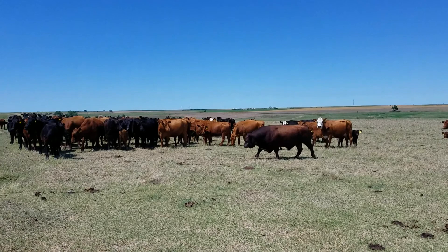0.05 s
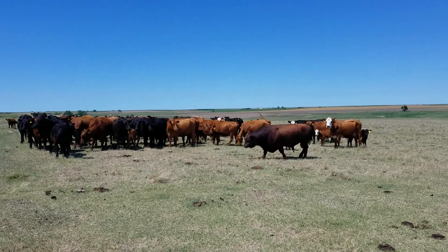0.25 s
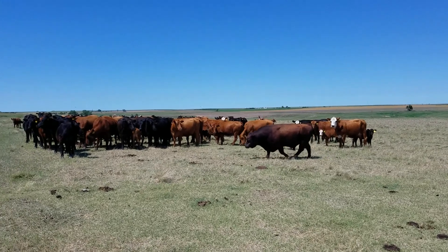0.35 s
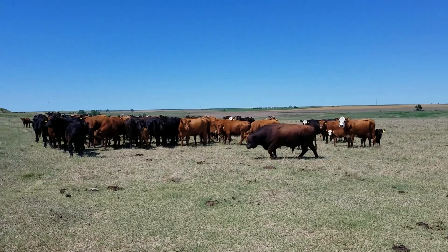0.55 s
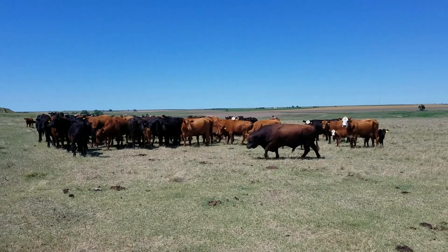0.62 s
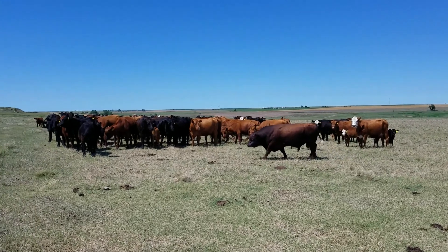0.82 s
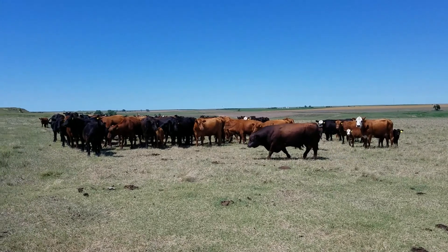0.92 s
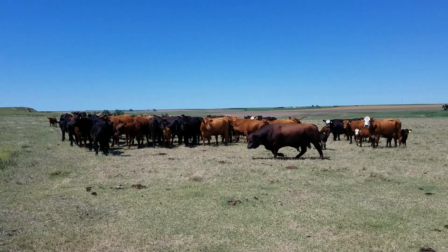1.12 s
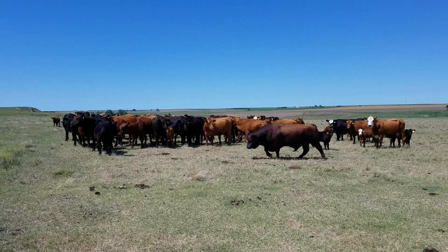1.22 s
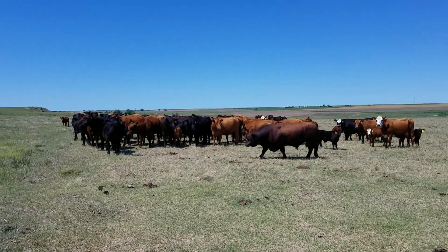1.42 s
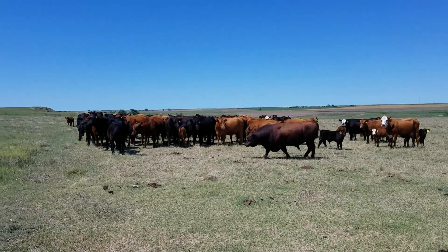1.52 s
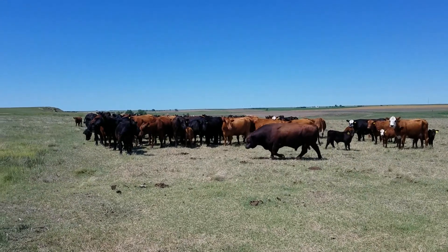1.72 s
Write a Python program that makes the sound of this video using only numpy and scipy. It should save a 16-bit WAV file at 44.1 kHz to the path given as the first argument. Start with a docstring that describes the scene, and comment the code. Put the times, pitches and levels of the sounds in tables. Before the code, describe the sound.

A bull bellows in an open pasture, slightly to the left. Its low groan swoops up by 0.25 seconds to a held, hoarse note with a squeal on top, loudest around 0.7 to 1.1 seconds, then drops into a grunt at 1.2. Two fainter cows moo from about 0.3 seconds, one stopping at 1.0, the other at 1.6. A faint herd drone and light wind continue throughout.

```python
"""Light wind and the low drone of a herd lie over an open pasture. A bull starts a low groan
that swoops up to a held, hoarse note, and farther off two cows begin to moo. While he strains,
his tense vocal folds add a squeal on top. One cow stops; then the bull's mouth shuts, his
pitch drops and his voice cracks into a grunt. The other cow outlasts him, leaving drone and wind."""
import sys
import numpy as np
from scipy import signal
from scipy.fft import rfft, irfft
from scipy.io import wavfile

SR = 44100
rng = np.random.default_rng(int(sys.argv[2]) if len(sys.argv) > 2 else 0)


def wav_record(signal):
    """Record a signal, one row per channel, as 16-bit PCM in the file named by sys.argv[1]."""
    frames = np.transpose(np.atleast_2d(signal))
    bounded = np.clip(frames, -1, 1)
    # unit amplitude maps onto the largest positive 16-bit level
    quanta = np.round(bounded * 32767).astype(np.int16)
    wavfile.write(sys.argv[1], SR, quanta)


N = 77175
TIME = np.arange(N) / SR
FREQS = np.fft.rfftfreq(2 * N, 1 / SR)


def amp(db):
    """Turns decibels into a number to multiply by."""
    return 10 ** (np.asarray(db) / 20)


def unit(x):
    """Scales a signal to an average strength (rms) of 1."""
    return x / np.sqrt(np.mean(x ** 2) + 1e-20)


def curve(table, column=1):
    """Joins the points of one table column over time."""
    rows = np.array(table)
    return np.interp(TIME, rows[:, 0], rows[:, column])


def level(table, column=2):
    """Loudness over time from a dB column, fading fast outside the table's times."""
    outside_s = np.maximum(table[0][0] - TIME, TIME - table[-1][0]).clip(0)
    return amp(curve(table, column)) * np.exp(-outside_s / 0.0027)


def spectrum(table, column=1):
    """Joins the points of one table column from bass to treble."""
    rows = np.array(table)
    return np.interp(np.log(FREQS + 1), np.log(rows[:, 0] + 1), rows[:, column])


def colour(x, gain):
    """Turns each frequency up or down by its own gain."""
    return irfft(rfft(x, 2 * N) * gain)[..., :N]


def wobble(hz):
    """A random wiggle of strength 1, mostly slower than hz."""
    return unit(colour(rng.standard_normal(N), 1 / (1 + (FREQS / hz) ** 4)))


def cycles(table):
    """Counts the vibrations so far along a table's pitch."""
    return np.cumsum(curve(table)) / SR


# The wind's tone colour: f/Hz, relative level/dB, how alike left and right are/0-1
WIND_COLOUR = [(20, -1, 0.021), (45, 1.5, .3), (110, -0.5, 0.34), (170, 0, 0.46), (323, -7.5, 0.55),
               (950, -14.5, 0.4), (1290, -20.5, 0.28), (2490, -16.5, 0), (4970, -23, 0), (10500, -29, 0),
               (13000, -23, 0), (15600, -25.5, 0)]


def wind():
    """Moving air makes a soft, lumpy rumble and hiss, partly different in each ear."""
    shared, separate = rng.standard_normal((2, N))
    gain, alike = amp(spectrum(WIND_COLOUR)), spectrum(WIND_COLOUR, 2)
    left = colour(shared, gain)
    right = colour(shared, gain * alike) + colour(separate, gain * np.sqrt(1 - alike ** 2))
    level_db = -61 + 1.6 * wobble(9.8)
    return amp(level_db) * unit(np.array([left, right]))


def ground_echo(sound, level_db=-18, fade_s=.25):
    """The ground and the herd scatter a faint, short echo to both ears."""
    t = TIME[:SR // 2]
    tail = rng.standard_normal((2, len(t))) * amp(-60 * t / fade_s)
    tail /= np.linalg.norm(tail[0])
    return amp(level_db) * signal.fftconvolve(sound[None], tail, axes=1)[:, :N]


def throat_delay(throat, column, smear_s_per_hz=5e-7, echo_radians=1.1, echo_s=.0014):
    """A throat smears each pulse: it rings, treble comes late, echoes run between folds and lips."""
    log_gain = np.log(amp(spectrum(throat, column)))
    ringing = -signal.hilbert(np.r_[log_gain, log_gain[-2:0:-1]]).imag[:N + 1]
    late_treble = -np.pi * smear_s_per_hz * FREQS ** 2
    echoes = echo_radians * np.sin(2 * np.pi * echo_s * FREQS)
    return np.exp(1j * (ringing + late_treble + echoes))


def voice(pitch_hz, turns, throat, mouth=0, open_column=1):
    """Vocal folds buzz at whole multiples of the pitch; throat and mouth set each one's strength."""
    narrow, wide = amp(spectrum(throat)), amp(spectrum(throat, open_column))
    delay = throat_delay(throat, open_column)
    buzz, power = 0, 0
    for k in range(1, 35):
        at = (k * pitch_hz / FREQS[1]).astype(int)
        gain = (1 - mouth) * narrow[at] + mouth * wide[at]
        buzz += gain * (np.exp(2j * np.pi * k * turns) * delay[at]).real
        power += gain ** 2 / 2
    return buzz / np.sqrt(power)


# The tunes of the herd's drone and the two cows: t/s, f/Hz, level/dB
HERD_DRONE = [(0, 80.92, -54), (.3, 82.06, -54), (1.0, 83.3, -61), (1.08, 80.44, -68), (1.35, 78.36, -64),
              (1.45, 78.4, -67.5), (1.75, 83.25, -67.5)]
SHORT_MOO = [(.22, 168.1, -56), (.31, 173, -44.5), (.42, 172, -55.5), (.62, 181.9, -55), (.8, 177, -55.5),
             (.89, 168.5, -47.5), (.95, 150, -42), (.99, 130.3, -66)]
LONG_MOO = [(.3, 166.7, -67), (.38, 173.6, -53.5), (.6, 179.7, -51), (.88, 174.9, -51), (1.1, 186.7, -50),
            (1.22, 187.9, -49.5), (1.4, 187, -50), (1.47, 185.9, -51), (1.52, 183, -53), (1.56, 175, -58.5),
            (1.585, 152.7, -51), (1.61, 150, -64)]
# How their throats colour the sound: f/Hz, relative level/dB
HERD_THROAT = [(80, 0.5), (160, -1), (245, -4.5), (330, -5.5), (420, -27), (800, -18), (970, -1.5),
               (1060, -13), (1180, -6), (1350, -21), (2000, -15.5), (3000, -42.5)]
SHORT_THROAT = [(160, -15), (330, -18), (440, 1.5), (540, 2), (700, -15), (1200, -8), (3000, -29),
                (6000, -49.5)]
LONG_THROAT = [(185, -16), (300, 1), (375, 2.5), (470, 13.5), (555, -14.5), (750, -6.5), (940, -11),
               (1130, 1.5), (1320, -5.5), (1700, -10.5), (2050, -17), (2630, -20.5), (2820, -7.5),
               (3350, -12), (3570, -14), (3950, -21.5), (4150, -26.5), (4700, -35.5), (4900, -24),
               (5150, -33.5), (7000, -37)]


def moo(tune, throat, waver_cycles):
    """A far-off animal sends a slightly wavering buzz through a throat that keeps its shape."""
    turns = cycles(tune) + waver_cycles * wobble(24)
    return level(tune) * voice(curve(tune), turns, throat)


# The three tones of the bull's squeal: t/s, f/Hz, level/dB
SQUEAL_HIGH = [(.35, 940.7, -60), (.42, 994, -47), (.5, 1117, -42), (.55, 1149, -38), (.65, 1194, -36),
               (.74, 1211, -36), (.82, 1199.7, -35), (.89, 1198.3, -34), (.96, 1162.7, -36),
               (1.01, 1147, -42), (1.04, 1110, -70)]
SQUEAL_MID = [(0.269, 797, -60), (0.339, 843, -43), (0.408, 868, -42), (0.469, 938, -44.5),
              (0.521, 1009, -45.5), (.62, 1091, -42.5), (0.731, 1134, -50.5), (.86, 1116, -46),
              (.96, 1065, -46), (1.03, 1040, -57.5)]
SQUEAL_LOW = [(.48, 616, -64.5), (.55, 635, -51.5), (.65, 641, -45), (0.749, 641.6, -41.5),
              (0.901, 644.6, -44.5), (1.0, 623, -51.5), (1.04, 604, -65)]


def squeal(turns, waver_cycles=0.019):
    """Tense folds add three free tones; the main pulse and the lowest tone shake the upper two."""
    high, mid, low = (level(tune) * np.cos(2 * np.pi * (cycles(tune) + waver_cycles * wobble(70)))
                      for tune in (SQUEAL_HIGH, SQUEAL_MID, SQUEAL_LOW))
    chop = 0.094 * (np.cos(2 * np.pi * turns) + np.cos(4 * np.pi * turns))
    mixing = 0.15 * low / abs(low).max()
    return np.sqrt(2) * (low + (high + mid) * (1 + chop + mixing))


# The tone colour of the bull's hoarse rasp, plus a thin high hiss that follows his loudness:
# f/Hz, relative level/dB
RASP_COLOUR = [(100, -37), (200, -6), (280, -11.5), (520, -4.5), (660, -7), (850, -0.5), (1250, 2),
               (1550, -2.5), (1750, -9.5), (1950, -6), (2300, -10), (2850, -10.5), (3600, -20), (4300, -40),
               (6500, -40), (8000, -49), (10500, -44.5), (13500, -35), (15600, -43.5)]


def rasp(turns, mouth, puff_share=0.77, puff_cycles=0.75):
    """Rough noise puffs once per vibration, softer and duller while the mouth is half shut."""
    puffs = 1 - puff_share + puff_share * unit(np.exp(-(turns % 1) / puff_cycles))
    bright = unit(colour(puffs * rng.standard_normal(N), amp(spectrum(RASP_COLOUR))))
    muffle_db = -12 + 8 / (1 + (FREQS / 3400) ** 6)  # bass loses 4 dB, treble 12 dB
    return mouth * bright + (1 - mouth) * colour(bright, amp(muffle_db))


# The bull's tune: t/s, f/Hz
BULL_PITCH = [(0, 98), (.1, 130), (.15, 146), (.2, 165), (.24, 196.4), (.34, 198.1), (.44, 193.9),
              (.52, 199), (.64, 202.5), (.78, 203), (1.06, 202.8), (1.12, 199.8), (1.16, 184), (1.185, 160),
              (1.23, 148)]
# How hard he pushes: t/s, voice level/dB, rasp level/dB, mouth opening/0-1
BULL_EFFORT = [(0, -60.5, -54.5, 0.3), (.1, -57.5, -58.5, 0.6), (.15, -45.5, -47, 0.33),
               (.21, -41.5, -48, 0.08), (.26, -38, -46.5, 0), (.35, -34, -38, 0.2),
               (.47, -33.5, -40.5, 0.77), (.58, -31.5, -39.5, .75), (.75, -30, -40.5, 1),
               (.96, -29.5, -45.5, 1), (1.01, -29.5, -41.5, 1), (1.06, -30, -44, 1), (1.14, -34, -46.5, 1),
               (1.175, -38.5, -41, 0.4), (1.215, -49, -54, 0), (1.24, -76, -79.5, 0)]
# His throat and mouth: f/Hz, relative level half open/dB, relative level wide open/dB
BULL_THROAT = [(91, -3, -20), (150, -8.5, -10), (199.4, 2.5, -2.5), (270, -12, -9), (335, -9, -8),
               (404, -11, -10.5), (469, -3, -9), (536, -0.5, -15.5), (614, -15.5, -14.5), (706, -4, -11),
               (814, 1, -6.5), (995, -21, -16), (1228, -0.5, 2), (1417, -18, -17.5), (1790, -22, -19),
               (2008, -18, -12.5), (2130, -39, -26.5), (2440, -29.5, -16.5), (2840, -37, -25),
               (3280, -50, -25.5), (4010, -48, -43), (4056, -63.5, -33), (4086, -63, -59),
               (7000, -67, -55.5)]
# How his closing mouth colours the grunt: f/Hz, level change/dB
GRUNT_COLOUR = [(150, -2), (260, 10.5), (340, 8), (480, 3), (680, -13.5), (1000, -3.5), (1500, -1),
                (3000, 4)]


def bellow(waver_cycles=0.0094, tremble=0.072, crack_s=1.19, crack_width_s=0.036, crack_depth=0.57):
    """The bull's folds buzz, with rasp and squeal on top, then slacken and crack into a grunt."""
    voice_gain, rasp_gain = level(BULL_EFFORT, 1), level(BULL_EFFORT, 2)
    mouth = curve(BULL_EFFORT, 3) ** 2
    hoarseness = np.minimum(rasp_gain / (voice_gain + 1e-12), 1)
    turns = cycles(BULL_PITCH) + waver_cycles * hoarseness * wobble(60)
    tone = voice(curve(BULL_PITCH), turns, BULL_THROAT, mouth, open_column=2)
    closing = np.exp(-((TIME - crack_s) / crack_width_s) ** 2)
    crack = crack_depth * closing * np.cos(np.pi * turns)  # strong and weak pulses alternate
    tone *= 1 + crack + tremble * wobble(31)
    grunt = colour(tone, amp(spectrum(GRUNT_COLOUR)))
    tone = (1 - closing) * tone + closing * grunt
    return voice_gain * tone + rasp_gain * rasp(turns, mouth) + squeal(turns)


# How the two ears differ: f/Hz, left minus right level/dB, left head start/radians
EARS = [(60, -1, 0.096), (199, 1, -0.6), (400, 2.5, 0.45), (750, 2.5, .6), (1230, 4, 1.05), (1780, 14, -.1),
        (2380, 0, 0.75), (3200, 10, 1.1), (4180, 6.5, -0.49), (8000, -10.5, 0), (14000, 19, 0)]


def scene():
    """The cattle, mostly a little louder and earlier on the left, with their echo and the wind."""
    cattle = bellow()
    cattle += moo(LONG_MOO, LONG_THROAT, waver_cycles=.004)
    cattle += moo(SHORT_MOO, SHORT_THROAT, waver_cycles=.029)
    cattle += moo(HERD_DRONE, HERD_THROAT, waver_cycles=.037)
    to_left = amp(spectrum(EARS) / 2) * np.exp(.5j * spectrum(EARS, 2))  # each ear takes half
    direct = np.array([colour(cattle, to_left), colour(cattle, 1 / to_left)])
    return direct + ground_echo(cattle) + wind()


def record(dry):
    """Cuts off the very highest treble, above 15700 Hz."""
    treble_cut = signal.firwin(511, 15700, window=("kaiser", 9), fs=SR)
    return signal.oaconvolve(dry, treble_cut[None], "same")


dry = scene()
out = record(dry)
wav_record(out)
```